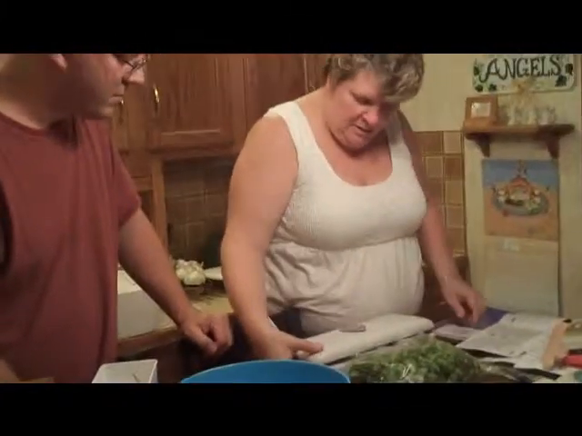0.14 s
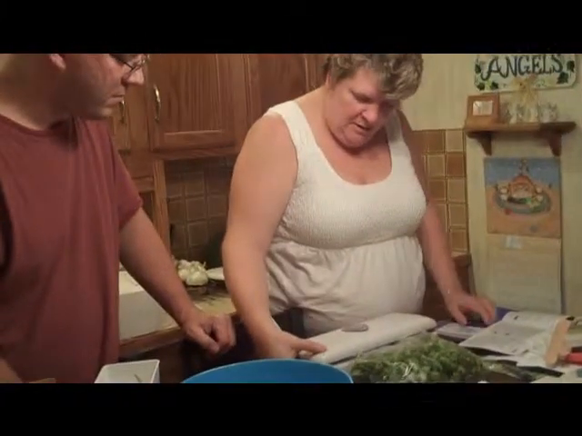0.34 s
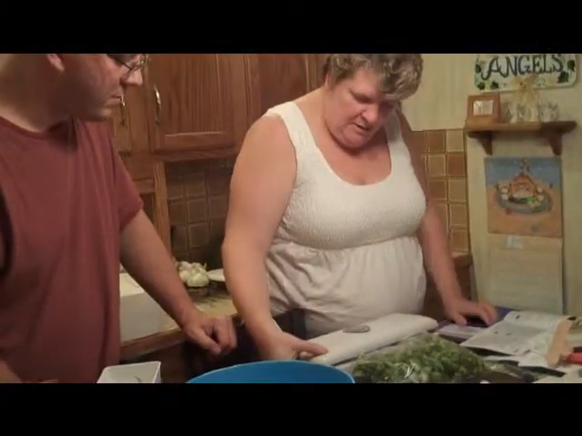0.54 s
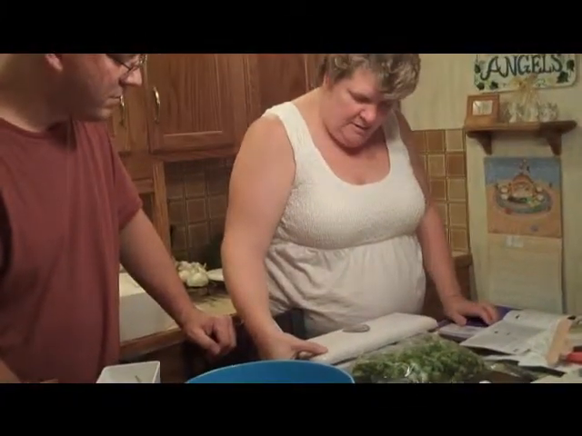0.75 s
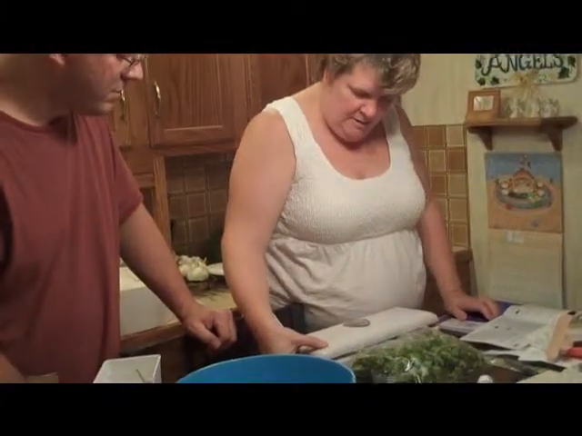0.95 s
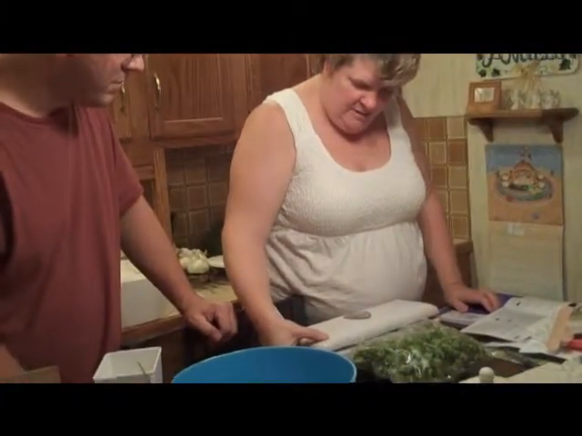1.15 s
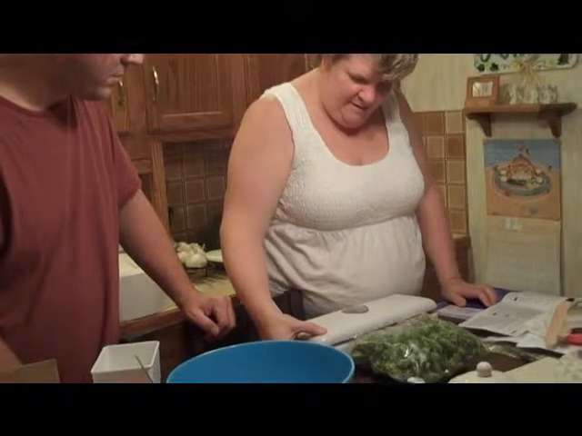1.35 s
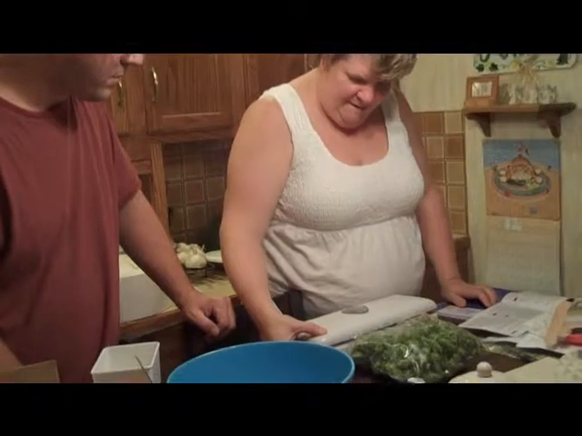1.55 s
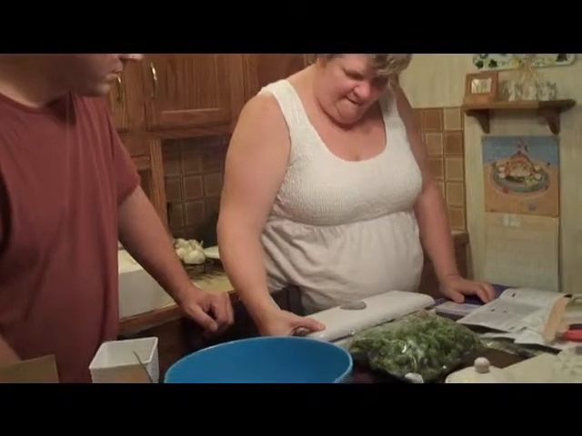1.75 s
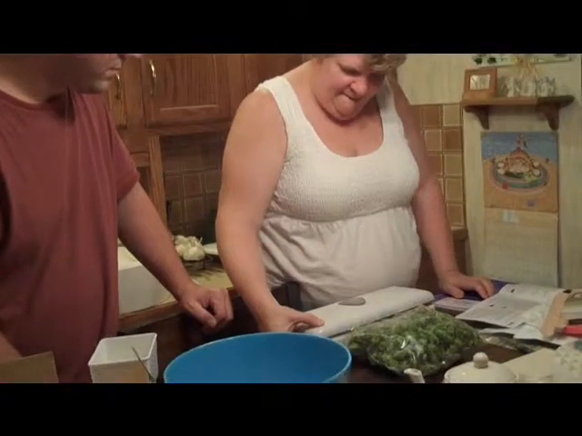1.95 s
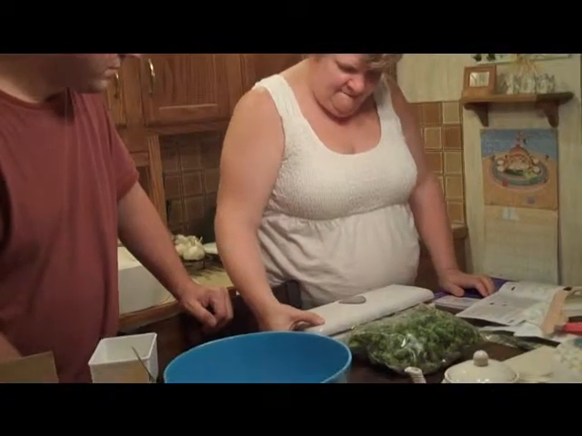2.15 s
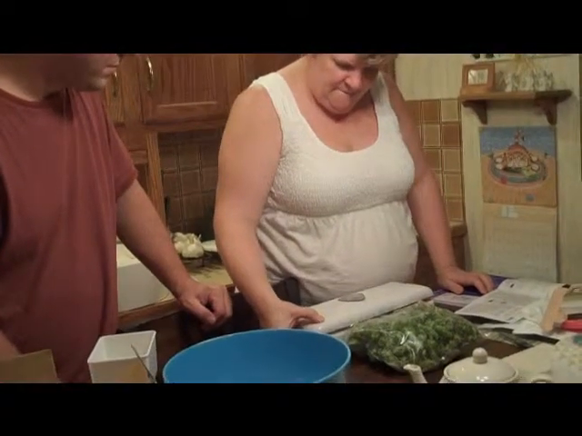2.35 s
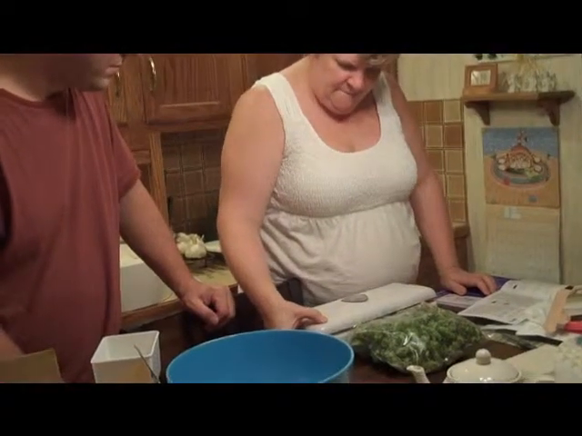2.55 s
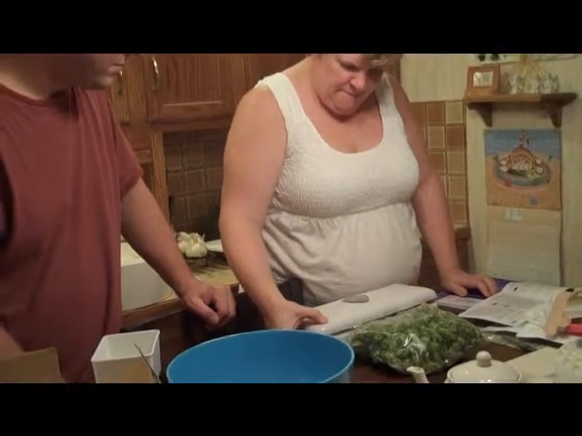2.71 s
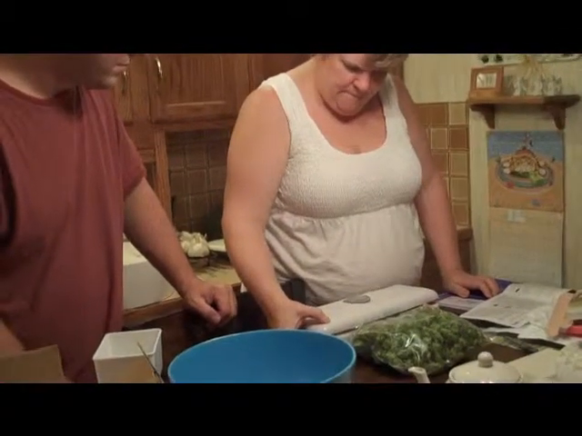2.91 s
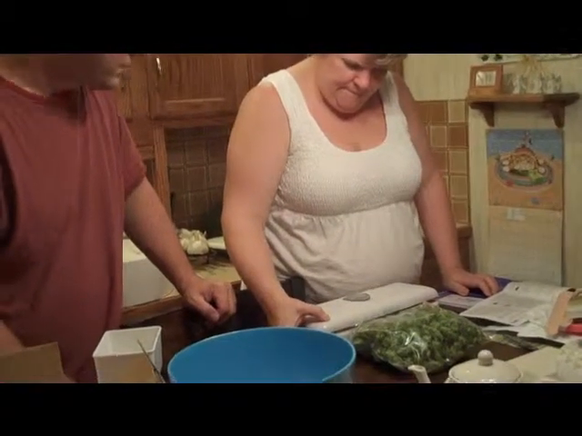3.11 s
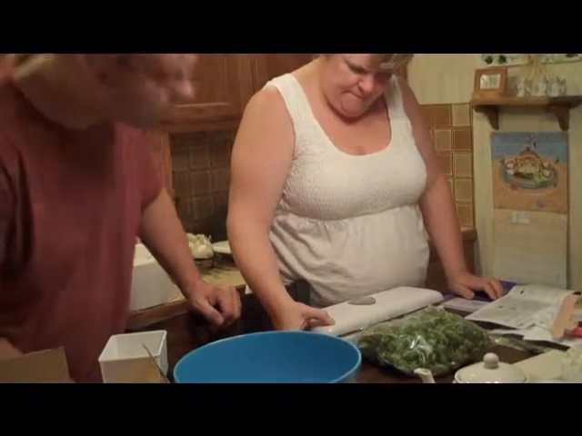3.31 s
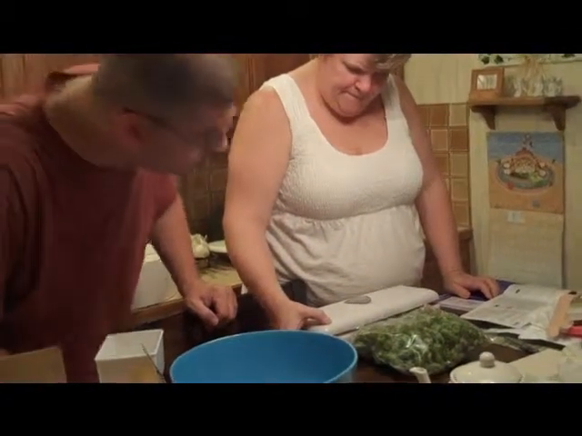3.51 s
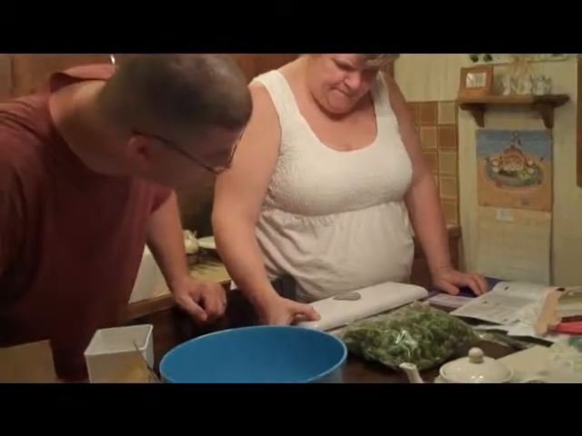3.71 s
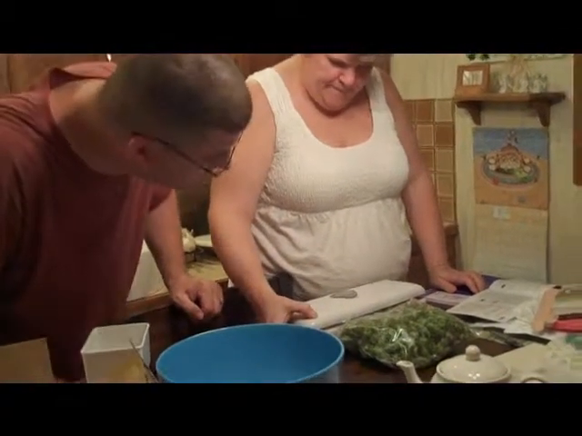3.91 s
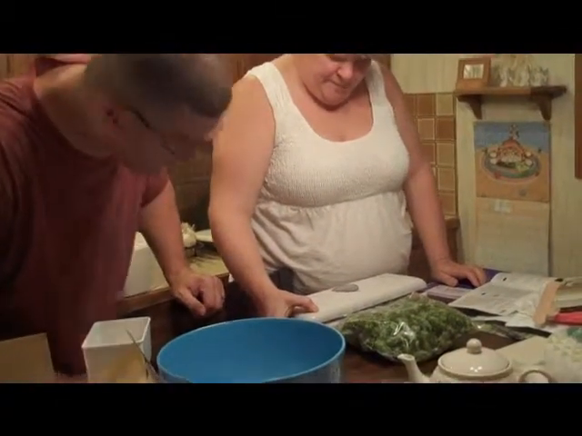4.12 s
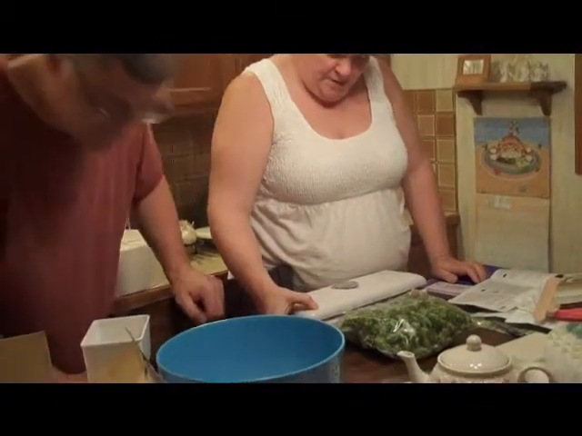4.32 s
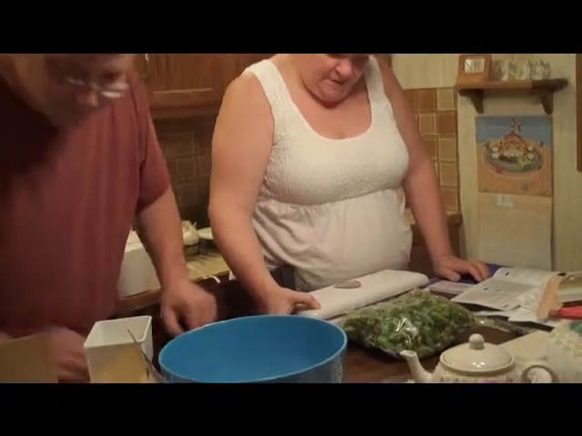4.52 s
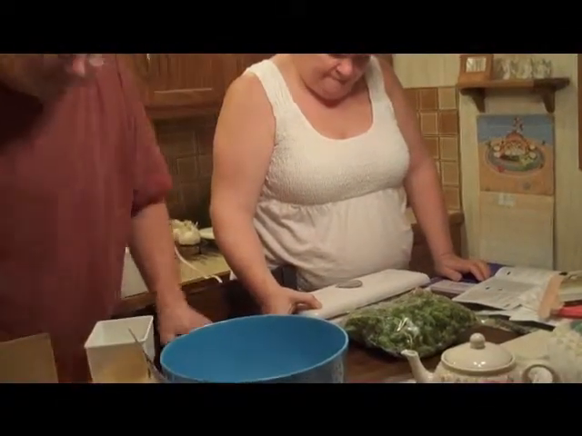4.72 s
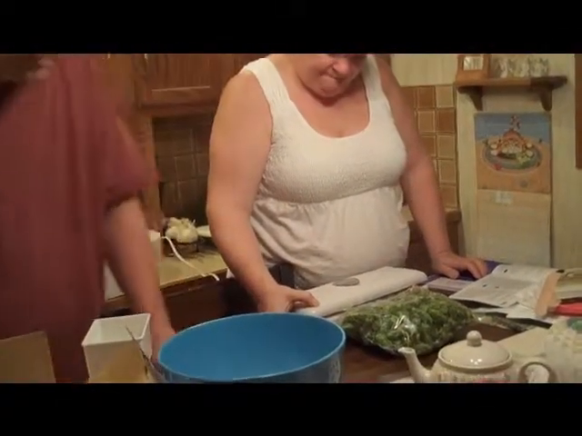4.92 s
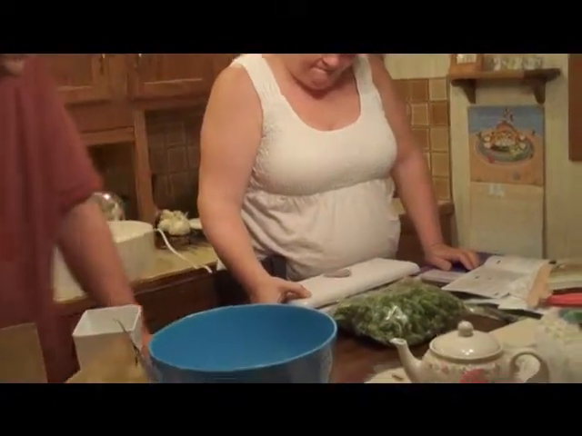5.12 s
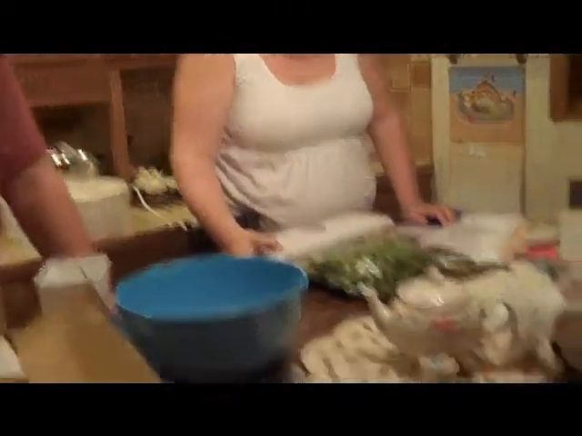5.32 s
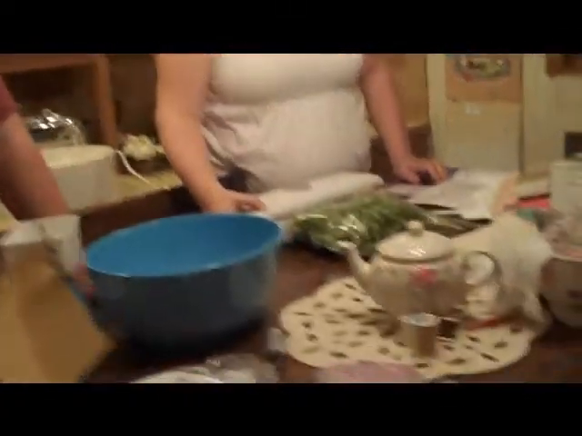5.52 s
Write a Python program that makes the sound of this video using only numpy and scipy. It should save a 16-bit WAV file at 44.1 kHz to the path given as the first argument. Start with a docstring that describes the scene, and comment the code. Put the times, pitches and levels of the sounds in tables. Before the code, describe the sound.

Vacuum sealer switched on with a snap; its little motor spins up quickly and holds a loud nasal whine with a rush of air.

```python
"""One sharp plastic click switches on a vacuum sealer on a kitchen counter, over a faint mains hum.
Its small motor then spins up to a steady whine and drives a geared-down piston that draws air from a bag.
The click is noise bursts ringing a plastic lid; the whine is many sine waves at multiples of the shaft speed.
Slack gears growl during the spin-up, and shaped noise makes the rush of brushes and valves."""
import sys
import numpy as np
from scipy import signal
from scipy.fft import rfft, irfft
from scipy.io import wavfile

SR = 44100
rng = np.random.default_rng(int(sys.argv[2]) if len(sys.argv) > 2 else 0)


def pcm_store(signal):
    """Save signal as 16-bit PCM."""
    levels = np.round(np.clip(np.atleast_2d(signal), -1, 1) * 32767)
    wavfile.write(sys.argv[1], SR, levels.astype(np.int16).T)


N = 249517
TIME = np.arange(N) / SR
BIN_HZ = np.maximum(np.fft.rfftfreq(N, 1 / SR), 1)
CUTOFF_HZ = 12900   # nothing much is heard above this

POWER_ON_S = 0.415   # the pump is first heard
SPIN_START_S, SPIN_UP_S = 0.370, 0.2864   # start and time constant of the run-up curve
PISTON_GEARING = 6   # shaft turns per piston stroke
COMMUTATOR_BARS = 5

# How alike the machine sounds at the two microphones.
# Each row: frequency in Hz, left-right likeness (1 = the same, 0 = unrelated).
LIKENESS = [(60, .87), (330, .96), (650, .92), (1100, .93), (1700, .77), (3000, .74), (3800, .52),
            (5500, .74), (7500, .5), (9500, .15), (11500, -.1)]


def from_db(db):
    """Turn decibels into gain."""
    return np.exp(np.asarray(db) * (np.log(10) / 20))


def rms_one(x):
    """Scale to unit power."""
    return x / np.sqrt(np.mean(np.abs(x) ** 2) + 1e-20)


def at_hz(points, hz):
    """Read a table between its rows, on a log-frequency axis."""
    table = np.array(points)
    return np.interp(np.log(hz), np.log(table[:, 0]), table[:, 1])


def bumps(peaks, hz):
    """Gain in dB of a set of resonances and hollows."""
    return sum(db / (1 + (2 * (hz - centre) / width) ** 2) for centre, width, db in peaks)


def ramp(start, length):
    """Rise from 0 to 1 over length seconds."""
    return np.clip((TIME - start) / length, 0, 1)


def dying_bursts(bursts, decay_s):
    """Sudden bursts, each a (start in seconds, level in dB), that die away with one time constant."""
    total = 0
    for start, db in bursts:
        decay = np.exp(-np.minimum(np.abs(TIME - start) / decay_s, 20))
        total = total + from_db(db) * (TIME >= start) * decay
    return total


def drift(rate):
    """Smooth random wander of spread 1 that changes about rate times a second."""
    step = 40   # drawn at every 40th sample, then joined by straight lines
    r = np.exp(-2 * np.pi * step * rate / SR)
    slow = signal.lfilter([1], [1, -2 * r, r * r], rng.standard_normal(N // step + 2002))[2000:]
    return np.interp(np.arange(N) / step, np.arange(len(slow)), rms_one(slow))


def pan(hz):
    """Left and right gains: the highest treble beams towards the left microphone."""
    # Each row: frequency in Hz, left minus right in dB.
    balance = [(100, -.5), (450, -1.2), (1100, .7), (2900, -1.2), (3800, -1.8), (5900, -1), (6400, 0),
               (6800, 4), (7200, 8), (7800, 12.5), (9500, 8.5), (11000, 12)]
    lean = from_db(at_hz(balance, hz))
    return np.array([lean, np.ones_like(lean)]) * 2 / (1 + lean)


def stereo_noise(colour, likeness, drive=1):
    """Noise shaped by a gain per frequency and pulsed by drive; its left-right average has rms 1."""
    mid, side = rfft(rng.standard_normal((2, N)) * drive)
    alike = np.clip(at_hz(likeness, BIN_HZ), -.99, .99)
    spectrum = np.sqrt(1 + alike) * mid + np.sqrt(1 - alike) * side * [[1], [-1]]
    pair = irfft(spectrum * colour * pan(BIN_HZ), N)
    return pair / pair.mean(axis=0).std()


def reflections(t60):
    """Dense echoes off counter and cupboards, 60 dB down after t60 seconds; different left and right."""
    t = TIME[:SR // 2]
    tail = rng.standard_normal((2, len(t))) * from_db(-60 * t / t60) * (t > .002)
    return tail / np.sqrt(np.sum(tail ** 2, axis=1, keepdims=True))   # unit energy


def echoes(x, t60):
    """What the kitchen sends back of a stereo sound."""
    return signal.fftconvolve(x, reflections(t60), axes=1)[:, :N]


def resonate(force, modes):
    """Resonances side by side, of alternating sign, each placed between the microphones."""
    out = 0
    for k, (hz, width, db) in enumerate(modes):
        r = np.exp(-np.pi * width / SR)   # a wide resonance dies fast
        feedback = [1, -2 * r * np.cos(2 * np.pi * hz / SR), r * r]
        mode = signal.lfilter([(1 - r * r) / 2, 0, (r * r - 1) / 2], feedback, force + 1e-18)
        out = out + (-1) ** k * from_db(db) * mode * pan(hz)[:, None]
    return out


def case_colour(hz):
    """Gain in dB of the case: a broad slope with resonances and hollows on it."""
    # Broad slope. Each row: frequency in Hz, gain in dB.
    slope = [(100, -27), (220, -12), (310, -3.5), (400, -3), (680, 0), (1300, 0.5), (2000, -1), (3200, 1),
             (3900, -3), (4600, 0.5), (5200, -4.5), (6000, 3), (7700, 1), (9200, -9), (10200, -13.5),
             (11700, -22), (12800, -44)]
    # Resonances and hollows. Each row: centre in Hz, width in Hz, gain in dB.
    case_peaks = [(484, 35, 4), (534, 18, -8.5), (592, 22, 6.5), (651, 15, 6), (926, 16, 0.5),
                  (1120, 37, 1), (1246, 15, 5), (1310, 21, -2.5), (1424, 86, 5), (1580, 40, 1),
                  (2100, 50, 4), (2400, 340, -1)]
    return at_hz(slope, hz) + bumps(case_peaks, hz)


def kitchen(noise_db=-50.5):
    """Quiet noise that reaches the microphones from all around, and the steady hum of appliances."""
    # Colour of the still room. Each row: frequency in Hz, relative level in dB.
    room_colour = [(15, -46), (25, -17), (65, -4), (91, -12.5), (145, -4), (213, -6.5), (243, -12),
                   (269, -5), (2070, -1.5), (3850, -9.5), (7350, -7), (10500, -27), (11800, -38),
                   (15600, -70)]
    # Spread of the room noise. Each row: frequency in Hz, left-right likeness.
    diffuse = [(60, .88), (500, .86), (1300, .64), (2600, .33), (4200, -.1), (11000, 0)]
    # Hum tones. Each row: frequency in Hz, level in dB.
    hum_tones = [(60, -75), (241, -68), (307, -71)]
    hum = 0
    for hz, db in hum_tones:
        hum = hum + np.sqrt(2) * from_db(db) * np.sin(2 * np.pi * (hz * TIME + rng.random()))
    return from_db(noise_db) * stereo_noise(from_db(at_hz(room_colour, BIN_HZ)), diffuse) + hum


def switch(level_db=-11, crack_db=-8, counter_db=-7, room_db=-4):
    """Short crunches crack, ring the plastic lid, bounce off the counter and die away in the kitchen."""
    # The snap and the two contacts that follow. Each row: start in seconds, relative level in dB.
    contacts = [(0.3750, -6), (0.3759, 0), (0.3775, -5)]
    # Ring of the switch and lid. Each row: centre in Hz, width in Hz, relative level in dB.
    lid_modes = [(1000, 360, -15), (2450, 140, 2), (3780, 550, 0), (4400, 630, 1.5), (5000, 540, 2),
                 (5870, 550, 3), (6950, 500, -0.5), (7850, 1000, -8), (9400, 820, -12)]
    force = dying_bursts(contacts, decay_s=0.0013)
    crunch = force * rng.choice([-1, 1], N)
    crack_band = signal.butter(2, [1500, 6000], "band", fs=SR, output="sos")
    crack = signal.sosfilt(crack_band, force * rng.choice([-1, 1], N))
    # the click is dull above 11 kHz
    soften = signal.butter(2, 11000, fs=SR, output="sos")
    ring = signal.sosfilt(np.vstack([soften, soften]), resonate(crunch, lid_modes) + from_db(crack_db) * crack)
    counter, room = echoes(ring, t60=.06), echoes(ring, t60=.28)
    return from_db(level_db) * (ring + from_db(counter_db) * counter + from_db(room_db) * room)


def motor_speed(full_speed_hz=352.98, creep_hz_per_s=1.483):
    """Turns per second: a run-up that levels off, a slow upward creep and small changes of load."""
    # Load on the shaft. Each row: time in seconds, turns per second gained or lost.
    load_shift = [(1.0, 0), (1.4, .6), (2.05, .3), (2.3, -.7), (2.9, -.1), (4.7, -.1), (5.4, .3)]
    running = np.maximum(TIME - SPIN_START_S, 1e-3)
    run_up = 1 - np.exp(-running / SPIN_UP_S)
    return (full_speed_hz + creep_hz_per_s * running) * run_up + np.interp(TIME, *np.transpose(load_shift))


def gear_rattle(speed, angle, level_db=-45.0, room_db=-7, uneven_db=4, bite_s=0.048):
    """Commutator bars jolt slack gears, whose teeth chatter: a broken growl that settles with the spin-up."""
    # Ring of the gearbox. Each row: centre in Hz, width in Hz, relative level in dB.
    gearbox_modes = [(683, 72, 9.5), (1010, 230, 3.5), (1230, 150, 8.5), (1500, 190, 6.5), (2690, 250, -1),
                     (5140, 380, -2)]
    # The gears lurch as the shaft catches. Each row: start in seconds, size of the added burst
    # in dB against the rattle.
    lurches = [(0.433, 5), (0.476, 0), (0.501, 4), (0.515, 4), (0.531, 2), (0.570, -6), (0.669, 9),
               (0.718, 8)]
    slack = .3 * drift(260)   # teeth land early or late
    bars = np.abs(np.diff(np.floor(COMMUTATOR_BARS * angle / (2 * np.pi) + slack), prepend=0))
    chatter = (rng.random(N) < 600 / SR) * rng.choice([-1, 1], N)   # about 600 stray knocks a second
    knocks = (bars + chatter) * from_db(uneven_db * (2 * rng.random(N) - 1))
    rattle = rms_one(resonate(knocks, gearbox_modes)) * (1 + dying_bursts(lurches, decay_s=0.011))
    torque = np.clip(2 * (1 - speed / speed[-1]), 0, 1) * (1 + ramp(POWER_ON_S, bite_s)) / 2
    return from_db(level_db) * torque * (rattle + from_db(room_db) * echoes(rattle, t60=0.15))


def brush_sweeps(speed, angle, flutter_hz=170, room_db=-4):
    """Starting current makes the brushes buzz: rasping tones sweep up the treble and die as the motor settles."""
    # Buzz tones. Each row: multiple of the motor speed, relative level in dB.
    brush_orders = [(35, 0), (37, -4), (40, -2), (41, -4), (45, -4), (50, -5)]
    # Level along the sweep. Each row: frequency in Hz, level in dB.
    brush_colour = [(5000, -61), (6600, -62), (7450, -44), (8300, -61), (9400, -62), (11000, -63),
                    (12700, -64)]
    buzz = 0
    for order, db in brush_orders:
        hz = order * speed
        rasp = 1 + drift(flutter_hz)   # sparking unsettles level and phase
        tone = np.sin(order * angle + drift(flutter_hz))
        buzz = buzz + from_db(db + at_hz(brush_colour, hz)) * rasp * tone * pan(hz)
    buzz = buzz * np.clip(10 * (1 - speed / speed[-1]), 0, 1)
    return buzz + from_db(room_db) * echoes(buzz, t60=.1)


def rush(speed, angle, stroke, split_hz=2600, per_turn=0.18, per_stroke=0.062, grain_db=0.8, ripple=0.28):
    """Brushes scrape with each turn and valves puff once a stroke; case and near surfaces colour the noise."""
    slowness = 1 - speed / speed[-1]
    rumble_db = -36.5 - 27.5 * slowness   # case rumble, which the shaft speed lowers further below
    hiss_db = -36.5 - 23.5 * slowness   # brush and air hiss
    near = np.abs(1 + ripple * rfft(reflections(t60=0.049)[0], N))
    colour = from_db(case_colour(BIN_HZ)) * near
    low_share = 1 / (1 + (BIN_HZ / split_hz) ** 4)
    puffs = 1 + per_stroke * np.sin(stroke)
    turning = 1 + per_turn * (np.cos(angle) + np.cos(2 * angle)) / 2
    scrapes = rms_one(turning * from_db(grain_db * drift(230)))
    rumble = stereo_noise(colour * np.sqrt(low_share), LIKENESS, puffs)
    hiss = stereo_noise(colour * np.sqrt(1 - low_share), LIKENESS, scrapes)
    return from_db(rumble_db) * rumble * np.sqrt(speed / speed[-1]) + from_db(hiss_db) * hiss


def running_levels(emptying_s=1.97):
    """Level in dB of each order at full speed: it follows the air left in the bag and movements in the room."""
    # Movements that shift the standing waves at the microphones: start in seconds, length in seconds.
    bystander_steps_back = (4.06, 0.32)
    bystander_turns = (4.74, 0.29)
    microphone_moves = (5.19, 0.35)
    # The commutator's tone. Each row: time in seconds, level in dB.
    commutator_tone = [(1.45, -49), (1.7, -44), (2.0, -39), (2.5, -38), (2.9, -34.5), (3.5, -34),
                       (4.2, -37.5), (4.62, -40.5), (4.95, -37), (5.16, -38.5), (5.28, -37), (5.46, -40),
                       (5.58, -32)]
    # Other strong orders. Each row: multiple of the motor speed, level in dB with the bag empty,
    # dB gained as it empties, dB change with each of the three movements above.
    strong_orders = [(1, -42.5, 2, 0, 0, 4.5), (2, -64.5, -34, 9, 6.5, -2.5),
                     (3, -32.5, 16.5, -0.5, -1, 3.5), (4, -56, 18, 11.5, 6.5, -2.5),
                     (6, -45.5, -0.5, -0.5, 5, 1.5), (7, -47.5, -6.5, -4.5, 9, -3),
                     (8, -38.5, 10, 5, 0.5, -7.5), (10, -37.5, 29, -3, -0.5, -4.5),
                     (16, -49.5, -1, 5.5, 1, -5), (18, -49, 9, 2, 2, -10), (20, -47, -4, -4.5, 2.5, 7),
                     (21, -65.5, -49.5, 13.5, 1, -10), (22, -43.5, 9, 5, -0.5, -1.5)]
    # Weaker orders. Each row: multiple of the motor speed, level in dB before the shared shift below.
    weak_orders = [(4.667, -55), (8.167, -53), (9, -48.5), (11, -56), (12, -55), (13, -59), (14, -56),
                   (15, -52), (17, -55), (19, -56), (23, -55), (24, -55), (25, -66), (26, -64), (27, -67),
                   (28, -66), (29, -65), (30, -55), (31, -67), (32, -61)]
    air = np.exp(-np.maximum(TIME - POWER_ON_S, 0) / emptying_s)   # 1 = full bag
    moves = np.array([ramp(*bystander_steps_back), ramp(*bystander_turns), ramp(*microphone_moves)])
    levels = {COMMUTATOR_BARS: np.interp(TIME, *np.transpose(commutator_tone))}
    for order, db, gain_db, *move_db in strong_orders:
        levels[round(order)] = db - gain_db * air + np.dot(move_db, moves)
    for order, db in weak_orders:
        levels[order] = db - 4 + 8.5 * air
    return levels


def starting_level(order, speed, level_db=-44.0, fall_db_per_octave=4.5):
    """Level in dB of an order on the way up: it sweeps through case, panels and standing waves."""
    # Orders that stand out under the starting current. Each row: multiple of the motor speed, extra dB.
    starting_orders = [(1, 6.5), (3, 2), (5, 13), (6, 3), (7, 2), (8, 3), (10, 6), (11, 3), (15, 5),
                       (19, 4), (20, 7), (21, 4), (22, 8), (23, 6), (24, 4), (25, 8), (26, 4), (27, 4),
                       (28, 4), (29, 3), (30, 7), (32, 3)]
    # Resonances and hollows of the panels. Each row: centre in Hz, width in Hz, gain in dB.
    panels = [(203, 163, -13), (326, 200, 9), (512, 185, -23), (657, 59, 11.5), (890, 51, 1.5),
              (2330, 360, 4), (2622, 52, 10.5), (4230, 360, 6.5), (5300, 180, -1), (7370, 600, 9.5),
              (7550, 220, 1), (8220, 630, 7), (10650, 1400, 22.5)]
    # Narrow peaks and nulls over the counter, which make the rising whine surge and break.
    # Each row: centre in Hz, width in Hz, gain in dB.
    standing_waves = [(332.5, 3.5, -10), (665.5, 4, -14), (1003, 50, 6), (1125, 130, -5), (1256, 45, 7),
                      (1307, 25, -10), (1353, 45, 3), (1395, 22, -5), (1458, 40, 9), (1481, 10, -10),
                      (1510, 45, 13), (1585, 7, -20), (1600, 60, 5), (1634, 6, -13), (1645, 11, 13),
                      (1657, 6, -15), (1692, 50, 9)]
    sweep_hz = np.arange(1, CUTOFF_HZ)
    path_db = case_colour(sweep_hz) + bumps(panels, sweep_hz) + bumps(standing_waves, sweep_hz)
    vigour_db = 20 * np.log10(np.minimum(speed / 265, 1))   # slow bars tap the brushes softly
    extra_db = sum(db for multiple, db in starting_orders if round(multiple) == order)
    source_db = level_db - fall_db_per_octave * np.log2(order) + extra_db
    return source_db + vigour_db + np.interp(order * speed, sweep_hz, path_db)


def swell_db(order):
    """Brief rises and falls of one order: chirps on the way up, slower swells at full speed."""
    # Each row: multiple of the motor speed, middle in seconds, length in seconds, change in dB.
    swells = [(5, .56, .04, -10), (2, .58, .18, -10), (3, .58, .07, -6), (15, .565, .06, 8),
              (5, .615, .035, 3), (5, .675, .05, -8), (25, .6, .05, 11), (3, .66, .07, 5),
              (20, .625, .04, 8), (20, .685, .04, 9), (20, .735, .04, 8), (10, .68, .04, 8),
              (32, .68, .05, 10), (31, .69, .07, 13), (30, .74, .18, 6), (11, .785, .04, 10),
              (15, .83, .26, 8), (11, .93, .24, 7), (4, .99, .06, 5), (7, 1.0, .07, 6), (8, 1.11, .06, 6),
              (25, 1.3, .35, 5), (7, 1.38, .1, 7), (6, 3.0, .35, -4), (8, 3.2, .35, -5), (22, 3.5, .4, 4),
              (6, 3.85, .4, 5), (3, 4.33, .25, 2), (5, 4.5, .16, -3), (8, 4.78, .14, -2.5),
              (3, 5.08, .2, -2.5), (8, 5.22, .14, 3), (22, 5.3, .25, -4), (4, 5.32, .22, 4),
              (4, 5.6, .2, -9)]
    total_db = 0
    for multiple, middle, length, db in swells:
        if multiple == order:
            total_db = total_db + db * np.exp(-np.minimum((2 * (TIME - middle) / length) ** 2, 20))
    return total_db


def motor_order(order, speed, angle, stroke):
    """One multiple of the shaft rate: a clean tone, a wavering part, short beats and the piston's throb."""
    wavering = np.clip(0.1 + 0.016 * order, 0, .8)
    clean = np.sqrt(1 - wavering ** 2)
    rate = 11 * (1 + order / 20)   # wavers per second
    phase = order * angle + rng.uniform(0, 2 * np.pi)
    sine, cosine = np.sin(phase), np.cos(phase)
    line = clean * sine + wavering * (drift(rate) * sine + drift(rate) * cosine) / np.sqrt(2)
    alike = at_hz(LIKENESS, order * speed[-1])
    side = np.sqrt((1 - alike) / (1 + alike)) * cosine * (clean + wavering * drift(rate))
    throb = 1 + .006 * order * np.sin(stroke + rng.uniform(0, 2 * np.pi))
    beat_db = min(0.07 * order, 2.5)   # higher orders flutter more, up to a limit
    beat_phase = 2 * np.pi * (8.5 * TIME + rng.random()) + 2 * drift(2.52)   # about 8.5 beats a second
    beats = from_db(beat_db * np.sin(beat_phase))
    return np.sqrt(2) * (line + side * [[1], [-1]]) * throb * beats * pan(order * speed)


def whine(speed, angle, stroke):
    """All motor orders, each passing from its starting to its running level as the motor settles."""
    # stays at 1 for about three time constants of the run-up, then fades
    starting = np.minimum(20.7 * np.exp((SPIN_START_S - TIME) / SPIN_UP_S), 1)
    low, high = 0, 0
    for order, running_db in running_levels().items():
        db = (1 - starting) * running_db + starting * starting_level(order, speed) + swell_db(order)
        line = from_db(db) * motor_order(order, speed, angle, stroke)
        if order <= COMMUTATOR_BARS:
            low = low + line
        else:
            high = high + line
    # while the upper lines climb fast, echoes lag behind them in pitch and beat against them
    current = np.clip(3 * (1 - speed / speed[-1]), 0, 1)
    smear = .5 * np.sqrt(current)
    late = signal.fftconvolve(high * smear, reflections(t60=.12)[:1], axes=1)[:, :N]
    direct = low + np.sqrt(1 - smear ** 2) * high
    return direct + .95 * late + .35 * echoes((low + high) * smear, t60=.2)


def pump(running_in_s=0.0081):
    """The shaft spins up, a little unsteady, and drives whine, buzz, rush and rattle together."""
    speed = motor_speed()
    angle = 2 * np.pi * np.cumsum(speed * (1 + .0004 * drift(14))) / SR
    stroke = angle / PISTON_GEARING
    turning = np.clip(speed / 200, 0, 1) ** 3   # a slow shaft hardly sings
    tones = turning * (whine(speed, angle, stroke) + brush_sweeps(speed, angle))
    noises = rush(speed, angle, stroke) + gear_rattle(speed, angle)
    return ramp(POWER_ON_S, running_in_s) * (tones + noises)


def scene():
    """Click, pump and room."""
    return switch() + pump() + kitchen()


def record(dry):
    """Cut the top steeply."""
    return signal.sosfilt(signal.ellip(10, .1, 80, CUTOFF_HZ, fs=SR, output="sos"), dry)


dry = scene()
out = record(dry)
pcm_store(out)
```